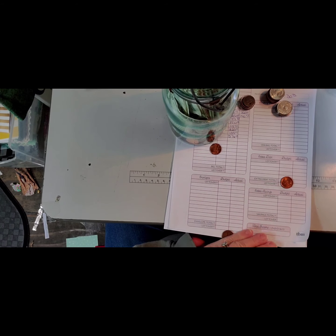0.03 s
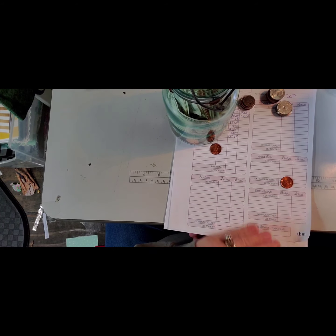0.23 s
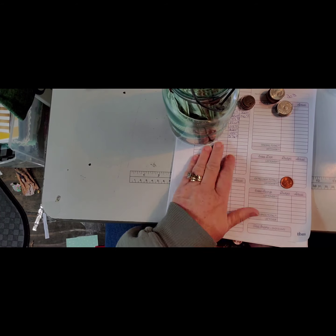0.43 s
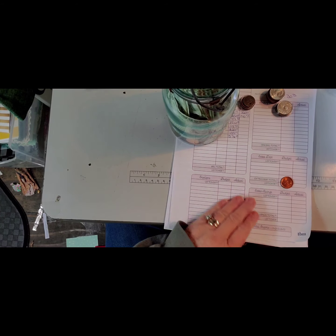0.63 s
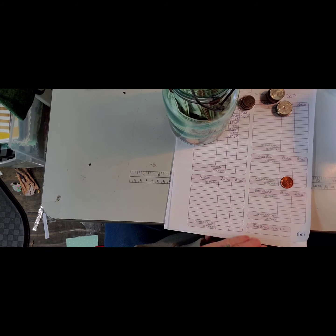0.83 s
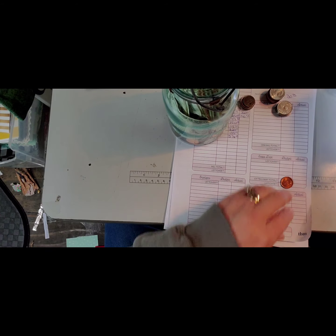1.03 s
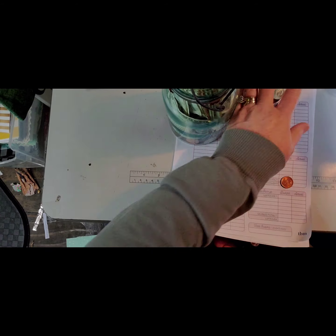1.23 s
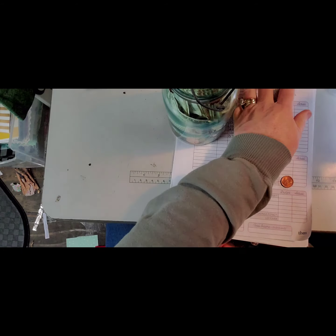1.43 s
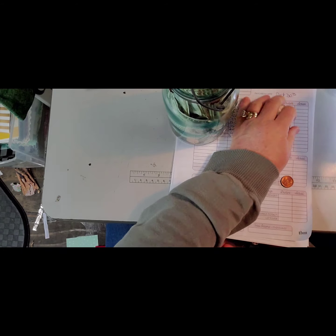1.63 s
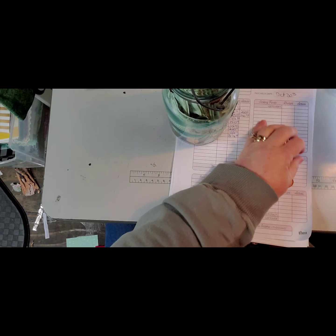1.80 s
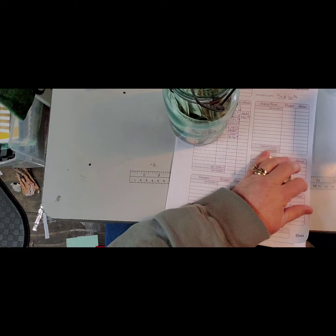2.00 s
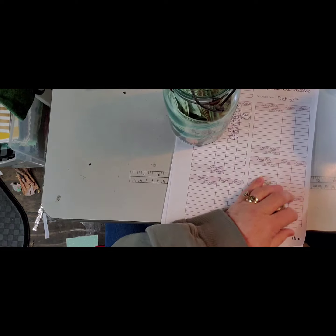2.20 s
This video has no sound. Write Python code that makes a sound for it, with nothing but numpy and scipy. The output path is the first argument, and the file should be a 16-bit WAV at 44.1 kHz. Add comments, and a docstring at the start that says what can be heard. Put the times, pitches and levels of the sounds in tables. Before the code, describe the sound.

Coins jingle quickly as a hand sweeps them up, a palm softly brushes paper, a coin clacks and the table is knocked, a glass jar clinks, then more coins tap and scrape over paper; close stereo, quiet small room.

```python
"""At a paper-covered table in a quiet room, coins are swept into a palm and jingle there.
A palm brushes the paper, knocks sound on the table and a glass jar is clinked after a faint touch.
Then more coins are tapped and dragged over the sheet, clicking together.
Coins and jar are impacts that excite decaying modes; knocks and taps are heavily damped impacts.
Sliding and brushing are stick-slip noise through resonances, above a low hum and room rumble."""
import sys
import numpy as np
from scipy import signal
from scipy.fft import rfft, irfft
from scipy.io import wavfile

SR = 44100
rng = np.random.default_rng(int(sys.argv[2]) if len(sys.argv) > 2 else 0)


def transcribe(u):
    """Save the signal u as a 16-bit wav file named by the first command-line argument.

    u: samples, shape (n,) or (channels, n), limited to [-1, 1]; the rate is SR.
    q: integer samples, one column per channel.
    """
    v = np.clip(np.atleast_2d(u).T, -1, 1)
    q = np.round(v * 32767).astype(np.int16)
    wavfile.write(sys.argv[1], SR, q)


N = 99577
TIME = np.arange(N) / SR  # s

# spectrum of a blunt contact with the table: (frequency [Hz], relative level [dB])
KNOCK_BODY = [(100, 1), (280, -1), (480, -5), (750, 8.5), (1050, 11), (1600, 9.5), (2150, -3), (2900, 4.5),
              (4000, 1), (4800, 5.5), (6000, 2), (6900, 5), (7800, -3), (10000, -17), (14500, -8)]
# spectrum of coins touching the paper: (frequency [Hz], relative level [dB])
TAP_BODY = [(200, -53.5), (950, -30), (1400, 1.5), (2100, -9), (2700, -3), (3400, -6), (5000, -4),
            (6400, 4), (8100, 1), (9500, -24), (12500, -12.5), (14500, -17)]


def amp(db):
    """Amplitude ratio: 20 dB is a factor of ten."""
    return 10 ** (np.asarray(db) / 20)


def evened(x):
    """Power normalisation: scales to rms 1 over all channels."""
    return x / np.sqrt(np.mean(x ** 2) + 1e-20)


def unit(x):
    """Energy normalisation: scales each channel to energy 1."""
    return x / np.sqrt(np.sum(x ** 2, -1, keepdims=True) + 1e-20)


def read(points, hz):
    """Logarithmic pitch scale: interpolates a table along log frequency."""
    f, value = np.transpose(points)
    return np.interp(np.log(hz + 1), np.log(f + 1), value)


def level(curve):
    """Amplitude envelope: gain from a dB curve, silent beyond 30 ms outside it."""
    s, db = np.transpose(curve)[:2]
    inside = (TIME > s[0] - .03) * (TIME < s[-1] + .03)
    return amp(np.interp(TIME, s, db)) * inside


def sides(pan_db):
    """Level-difference stereo: left and right gains that differ by pan_db."""
    return amp([[pan_db / 2], [-pan_db / 2]])


def add(mix, s, sound):
    """Superposition: mixes a sound in at time s, in place."""
    part = mix[:, max(round(s * SR), 0):][:, :sound.shape[1]]
    part += sound[:, :part.shape[1]]


def convolve(x, response):
    """Linear filtering: convolves channel by channel, keeping the length."""
    return signal.fftconvolve(x, np.atleast_2d(response), axes=1)[:, :x.shape[1]]


def colour(x, body, tilt_db=0):
    """Minimum-phase filter of unit energy with the given spectrum, tilted per octave above 500 Hz."""
    hz = abs(np.fft.fftfreq(2048, 1 / SR))
    tilt = tilt_db * np.log2(np.maximum(hz, 500))
    log_gain = np.log(amp(read(body, hz) + tilt))
    # the Hilbert transform of the log gain gives the phase of a causal response
    response = np.fft.ifft(np.exp(signal.hilbert(log_gain).conj())).real
    return convolve(x, unit(response[:len(hz) // 2]))


def pair(x, body=((1, 0), (2, 0))):
    """Spatial coherence: two unrelated signals become alike in the bass, as at two near microphones."""
    # (frequency [Hz], left-right correlation [0 to 1])
    likeness = [(30, .96), (120, .9), (300, .78), (800, .85), (1500, .75), (3500, .5), (7000, .15),
                (14000, 0)]
    hz = np.fft.rfftfreq(x.shape[1], 1 / SR)
    a, b = rfft(x)
    same = np.clip(read(likeness, hz), -1, 1)
    mid = a * np.sqrt(1 + same)
    side = b * np.sqrt(1 - same)
    return irfft(np.array([mid + side, mid - side]) * amp(read(body, hz)), x.shape[1])


def resonate(x, hz, width):
    """Moving resonance: shifts the curve hz down to zero, low-passes there and shifts back."""
    turn = np.exp(2j * np.pi * np.cumsum(hz * np.ones(N)) / SR)
    r = np.exp(-np.pi * width / SR)
    slow = signal.lfilter([1], [1, -2 * r, r * r], x / turn)
    return evened((turn * slow).real)


def friction(per_s, spread_db, smooth):
    """Stick-slip friction: noise bursts from tiny slips of uneven size over a smooth hiss."""
    slip = rng.random(N) < per_s / SR
    size = amp(spread_db * np.minimum(rng.exponential(1, N), 3.5)) * slip
    burst = signal.lfilter([1], [1, -np.exp(-1 / (0.00019 * SR))], size)  # 0.19 ms decay
    return evened(pair((evened(burst) + smooth) * rng.standard_normal((2, N))))


def crackle(per_s, spread_db, count=20):
    """Shot noise: separate tiny contacts, each a short grain at one of count pitches."""
    grain_s = .0002  # time constant
    t, out = TIME[:256], np.zeros((2, N))
    for hz in np.linspace(1400, 14500, count):
        touch = rng.random(N) < per_s / count / SR
        size = amp(spread_db * np.minimum(rng.exponential(1, N), 3)) * touch
        grain = np.exp(-t / grain_s) * ring(hz, 0, 0.33)[:, :len(t)]
        out += signal.oaconvolve(size[None], grain, axes=1)[:, :N]
    return evened(out)


def contact(scatter_s, scatter_db, lag_size=4):
    """Impulse excitation: a click that reaches the left microphone first, with decaying chatter."""
    t = TIME[:SR // 4]
    chatter = pair(rng.standard_normal((2, len(t)))) * amp(-60 * t / scatter_s)
    x = amp(scatter_db) * unit(chatter)
    x[0, 0] += 1
    x[1, lag_size] += 1  # lag in samples
    return x


def ring(hz, db, t60):
    """Damped oscillation: one dying mode, with its own phase at each microphone."""
    t = TIME[:SR // 4]
    rise = 1 - np.exp(-t * hz)
    phase = rng.random((2, 1)) * min(hz / 12000, 1)  # cycles
    return rise * amp(db - 60 * t / max(t60, .002)) * np.sin(2 * np.pi * (hz * t + phase))


def coin_ring(struck_hz=0):
    """Modal synthesis: the modes of mixed coins sum, and those near struck_hz stand out."""
    # modes of the coins: (frequency [Hz]) and their (strength [dB])
    mode_hz = [3531, 5075, 5433, 5615, 5776, 6643, 6829, 7287, 7521, 7849, 8258, 9593, 12576, 12648, 12790,
               12930, 13050, 13150, 13537, 14147, 14400]
    mode_strength = [-14, -4, -5, -5, -6, -7, -7, -8, -2, -5, -3, -12, 1, 3, 0, -2, 1, -2, -1, -4, -9]
    struck_db, struck_width_hz = 7, 400
    detune, spread_db, t60_s = .002, 2.5, .085  # detune is a fraction of the frequency
    hz = np.array(mode_hz)
    struck = struck_db * np.exp(-((hz - struck_hz) / struck_width_hz) ** 2)
    db = mode_strength + struck + spread_db * rng.standard_normal(len(hz))
    return unit(sum(ring(f * (1 + detune * rng.normal()), mode_db, t60_s) for f, mode_db in zip(hz, db)))


def coins():
    """Impact and free vibration: coins click, ring as the hand lets them, and jostle in between."""
    # coin on coin: (time [s], level [dB], brightness [dB/octave, held to -5 or more],
    # ringing relative to the click [dB], pitch that rings most [Hz])
    clinks = [(.0115, -17.5, -7, -1, 4970), (.0183, -15.5, 27, 3.5, 12500), (0.0786, -6, 0.5, -13, 9600),
              (.0843, -28, 16, -6, 12500), (0.1003, -20, 0, 4, 6650), (.1045, -29, 10, 3.5, 12300),
              (0.1373, -20.5, -4, 4, 12580), (.174, -32, 14, 3, 7900), (0.1955, -12, 16, -6, 14000),
              (0.2032, -21, 2, 0.5, 7600), (.2195, -28, -12, 8, 6800), (0.2306, -24, -3, 11, 13200),
              (0.237, -37, 11, 9, 13400), (0.2566, -13.5, 4.5, -3, 7540), (0.2617, -10, 2, -7, 7300),
              (.2680, -19, 1.5, 11, 12640), (0.2743, -14, 4, -7, 12600), (0.32, -28.5, -2.5, -6, 12500),
              (0.9558, -38, 0, 16, 6700), (0.9613, -8.5, -0.5, -3, 5570), (0.982, -29.5, -4, 5, 5500),
              (0.9953, -15.5, 2, -8, 5360), (1.046, -12, -5.5, -21, 13200), (1.083, -31, -2.5, -6, 5660),
              (1.7487, -27.5, 0.5, -8, 6700), (1.8243, -14, 6, -3.5, 5620), (1.9773, -23.5, 13, -6, 13600),
              (2.0041, -27, 4, -8, 12600), (2.1473, -17.5, 15.5, -8.5, 12500)]
    # coins damped by the hand: (frequency [Hz], relative level [dB])
    coin_body = [(300, -54.5), (2300, -16.5), (3200, -1), (4400, 0.5), (5300, 1.5), (6200, 1), (7300, 2.5),
                 (8400, 1), (9500, -8), (11300, -5.5), (12900, 7.5), (14500, -13)]
    # small jostling between the clinks: (time [s], level [dB])
    jostle = [(0, -45.5), (.022, -47.5), (.05, -66), (.07, -55), (.11, -43), (.13, -83), (.15, -61),
              (.185, -48), (.205, -39), (.25, -45.5), (.28, -47.5), (.302, -52.5), (.33, -57), (.37, -77)]
    # where the coins are: (time [s], left over right [dB])
    coin_place = [(.3, 0.3), (.96, 2), (2.1, 2.5)]
    scatter_s, chatter_db = .011, 35.5  # chatter is raised or lowered with the ringing
    out = np.zeros((2, N))
    for s, db, tilt_db, ring_db, struck_hz in clinks:
        click = unit(colour(contact(scatter_s, chatter_db + ring_db), coin_body, max(tilt_db, -5)))
        add(out, s, amp(db) * (click + amp(ring_db) * coin_ring(struck_hz)))
    slips = crackle(per_s=1100, spread_db=5.5) * level(jostle)
    out = out + amp(-1) * colour(slips, coin_body) + amp(-8.5) * convolve(slips, coin_ring())
    pan_db = np.interp(TIME, *np.transpose(coin_place))
    return out * amp([pan_db / 2, -pan_db / 2])


def sliding():
    """Stick-slip and sympathetic resonance: coins scrape the paper and the sheet sounds under them."""
    # coins sliding toward the table edge: (time [s], level [dB]), (frequency [Hz], relative level [dB])
    edge_slide = [(0, -46), (.06, -50), (.16, -46), (.24, -47.5), (.29, -55), (.34, -75)]
    edge_body = [(300, -53), (1250, -19), (1500, -11), (1780, 1), (2050, -40), (2700, -12), (3200, 4.5),
                 (4100, -3), (6000, -19.5), (14500, -6.5)]
    # coins dragged over the paper: (time [s], level [dB]), (frequency [Hz], relative level [dB])
    drag = [(1.53, -115), (1.545, -53), (1.58, -68.5), (1.63, -58.5), (1.675, -65), (1.72, -62.5),
            (1.79, -62.5), (1.835, -58), (1.88, -57.5), (1.95, -64), (1.99, -59.5), (2.08, -65.5),
            (2.26, -65)]
    drag_body = [(410, -25), (700, -17.5), (1060, -17.5), (1250, -4), (1500, -12.5), (1640, -4), (2310, -7),
                 (2720, -8), (4460, -9), (6040, -7), (7890, -11.5), (9540, -12), (14500, -12.5)]
    # share of crackle in the drag, falling as the coins settle flat: (time [s], level [dB])
    drag_crackle = [(1.53, 0), (1.7, 0), (1.9, -9), (2.26, -14)]
    # sheet and table under the dragged coins: (time [s], level [dB], resonance [Hz])
    drag_drone = [(1.55, -89.5, 1530), (1.63, -55.5, 1400), (1.69, -65, 1230), (1.74, -73, 1350),
                  (1.80, -68.5, 1400), (1.834, -48.5, 1380), (1.89, -59, 1400), (1.96, -75, 1550),
                  (1.98, -53, 1900), (2.03, -82, 1840), (2.1, -77, 1340)]
    edge = colour(friction(per_s=2300, spread_db=4.0, smooth=0.89), edge_body) * level(edge_slide)
    catches = colour(crackle(per_s=500, spread_db=2), TAP_BODY) * level(drag_crackle)
    hiss = 1.43 * colour(friction(per_s=1300, spread_db=-10, smooth=8.7), [(200, -27)] + drag_body)
    s, _, hz = np.transpose(drag_drone)
    slips = friction(per_s=980, spread_db=4, smooth=1.0)
    drone = resonate(slips, np.interp(TIME, s, hz), width=350) * level(drag_drone)
    return edge + sides(pan_db=1.5) * ((catches + hiss) * level(drag) + drone)


def blows(table, body, scatter_s, scatter_db):
    """Overdamped impact: dead blows, coloured by what they land on."""
    out = np.zeros((2, N))
    for s, db, tilt_db in table:
        blow = unit(colour(contact(scatter_s, scatter_db), body, tilt_db))
        add(out, s, amp(db) * sides(pan_db=2) * blow)
    return out


def taps():
    """Impact on a soft layer: coins tip and tap on the paper."""
    # (time [s], level [dB], brightness [dB/octave])
    tap_hits = [(1.5435, -28, -3), (1.5483, -18.5, 4.5), (1.5528, -22.5, 1.5), (1.5636, -29, 0),
                (1.5892, -31, -2), (1.5982, -27, 5), (1.6113, -26, -2.5), (1.634, -25.5, -1.5),
                (1.6511, -24.5, 2), (1.665, -21.5, 5), (1.6705, -36, -1), (1.685, -46, 2),
                (1.697, -23.5, 3.5), (1.8242, -22.5, -3), (1.838, -31, -7.5), (1.9768, -28.5, -7)]
    return blows(tap_hits, TAP_BODY, scatter_s=0.016, scatter_db=2.5)


def clacks():
    """Impact of flat faces: coins land flat with single clacks and almost no chatter."""
    # (time [s], level [dB], brightness [dB/octave]), (frequency [Hz], relative level [dB])
    clack_hits = [(.9619, -12, 0), (1.8245, -25, 5)]
    clack_body = [(150, -18), (500, -6), (1200, 0), (3000, 5), (4600, 5), (5600, 9.5), (7500, 7.5),
                  (9000, 3), (10000, -6), (14500, -4)]
    return blows(clack_hits, clack_body, scatter_s=0.002, scatter_db=-8)


def knocks():
    """Impact on a damped plate: blunt knocks on the table."""
    # (time [s], level [dB], brightness [dB/octave])
    knock_hits = [(.494, -39, 0), (1.0452, -6, 1.5), (1.0504, -27.5, 1), (1.173, -36, 0), (2.103, -32, 2)]
    return blows(knock_hits, KNOCK_BODY, scatter_s=0.01, scatter_db=-4)


def hiss_swells():
    """Swelling noise: a short faint hiss rises up to a knock and to the jar clink, then stops."""
    # (time the hiss stops [s], level [dB], build-up time constant [s], brightness [dB/octave])
    swell_ends = [(1.0457, -32, 0.0072, 4.5), (1.293, -49, 0.0019, 3)]
    hiss = friction(per_s=3100, spread_db=-6, smooth=0.66)
    out = np.zeros((2, N))
    for s, db, build_s, tilt_db in swell_ends:
        swell = np.exp(-abs(TIME - s) / build_s) * (TIME < s)
        out += colour(hiss * amp(db) * swell, KNOCK_BODY, tilt_db)
    return out


def jar():
    """Modal vibration of a shell: the glass rings shortly, damped by what fills it."""
    # metal against the jar: (time [s], level [dB])
    jar_hits = [(1.275, -32.5), (1.2959, 2.5)]
    # modes of the glass: (frequency [Hz]) and their (strength [dB], t60 [s], left over right [dB])
    glass_hz = [2515, 2590, 3300, 3758, 3989, 4387, 4740, 4790, 4924, 5640, 5770, 5850, 7574, 8520, 10840,
                12180, 13390, 13810]
    glass_modes = [(3, .045, 2), (-3, .025, 2), (-17, .06, 0), (-15, .09, 0), (-17, .06, 0), (-17, .07, 0),
                   (-1, .055, 1), (-5, .04, 1), (-17, .11, 0), (-7, .025, -2), (5, .052, -5),
                   (-15, .13, -4), (-19, .06, 0), (0, .055, -6), (-17, .08, 0), (-17, .09, 0),
                   (-19, .08, 0), (-23, .1, 0)]
    # spectrum of the contact: (frequency [Hz], relative level [dB])
    tick_body = [(200, -30), (900, -24), (1850, -22), (2600, 0), (3200, -5), (3900, -3), (4350, -7),
                 (5300, 0), (6200, -3), (7000, -11), (9000, -11), (14500, -17)]
    lag_s, tick_db = .00004, -7  # the ringing reaches the right microphone later by lag_s
    t = np.maximum(TIME[:SR // 4] - np.array([[0], [lag_s]]), 0)
    glass = 0
    for hz, (db, t60, pan_db) in zip(glass_hz, glass_modes):
        glass = glass + sides(pan_db) * amp(db - 60 * t / t60) * np.sin(2 * np.pi * hz * t)
    glass = glass * (1 - np.exp(-t * glass_hz[0])) ** 2  # soft onset
    tick = unit(colour(contact(scatter_s=.032, scatter_db=9), tick_body))
    out = np.zeros((2, N))
    for s, db in jar_hits:
        add(out, s, amp(db) * (glass / np.linalg.norm(glass) + amp(tick_db) * tick))
    return out


def hand():
    """Friction and cavity resonance: skin and cloth rub, and the hollow under the palm rises in pitch."""
    # palm brushing the paper: (time [s], level [dB], resonance [Hz]), (frequency [Hz], relative level [dB])
    brush = [(0.514, -75.5, 1610), (.545, -60.5, 1840), (.60, -56, 1870), (0.661, -57, 2150),
             (.72, -60, 2320), (.79, -61, 2680), (.85, -68.5, 2560), (.9, -69, 2500), (.95, -75.5, 2670)]
    brush_body = [(470, -40.5), (800, -34), (1160, -13), (1300, -14.5), (1500, -9.5), (1910, -4.5),
                  (2060, -7), (3190, -5), (4310, -11), (7720, -9), (14500, -16.5)]
    # sleeve moving over the table: (time [s], level [dB]), (frequency [Hz], relative level [dB])
    sleeve = [(1.08, -103), (1.15, -77), (1.21, -86), (1.27, -64), (1.35, -61), (1.395, -65.5),
              (1.45, -74.5), (1.52, -103)]
    sleeve_body = [(500, -12.5), (1800, -5), (3000, 10), (3800, 4), (6000, -0.5), (10000, -12.5),
                   (14500, -28.5)]
    # low rustle of the arm: (time [s], level [dB]), (frequency [Hz], relative level [dB])
    arm = [(.8, -75), (1.2, -76), (1.6, -74.5), (1.95, -70.5), (2.15, -67), (2.26, -65)]
    arm_body = [(60, -10), (150, -8), (270, 2), (500, -13), (1200, -37), (4000, -55)]
    hollow_db = -10  # relative to the rub
    s, _, hz = np.transpose(brush)
    rub = friction(per_s=2100, spread_db=-8, smooth=5.7)
    hollow = resonate(pair(rng.standard_normal((2, N))), np.interp(TIME, s, hz), width=700)
    palm = (colour(rub, [(300, -33)] + brush_body) + amp(hollow_db) * hollow) * level(brush)
    cloth = friction(per_s=600, spread_db=-4.5, smooth=1.3)
    return palm + colour(cloth, sleeve_body) * level(sleeve) + colour(cloth, arm_body) * level(arm)


def background():
    """Stationary noise and a narrow-band tone: room rumble, faint hiss and a wavering low hum."""
    # spectrum of the room noise: (frequency [Hz], relative level [dB])
    floor_body = [(20, -28), (30, -10), (42, -1), (65, -0.5), (95, -7.5), (145, -17), (280, -16),
                  (400, -20.5), (800, -30.5), (1800, -29.5), (3000, -33.5), (8000, -36), (9500, -48),
                  (13000, -38.5), (14500, -44)]
    floor_db, hum_db = -64.5, -64  # rms
    hum_hz, hum_width_hz, waver = 81.56, 40.6, 0.64
    hum = np.sin(2 * np.pi * hum_hz * TIME)
    hum = hum + waver * resonate(rng.standard_normal(N), hum_hz, hum_width_hz)
    noise = evened(pair(rng.standard_normal((2, N)), floor_body))
    return amp(floor_db) * noise + amp(hum_db) * evened(hum)


def room(x, wet_db):
    """Reverberation: quick reflections from table and jar, then the faint tail of a small room."""
    # decay of the tail: (frequency [Hz], t60 [s])
    room_t60 = [(200, 0.25), (1500, 0.14), (5000, 0.11), (14000, 0.046)]
    early_t60_s, early_db, tail_db = 0.058, -5, -17.5  # levels before wet_db
    t = TIME[:SR // 2]
    sparse = rng.standard_normal((2, len(t))) * (rng.random((2, len(t))) < .15)
    early = unit(pair(sparse) * amp(-60 * t / early_t60_s) * (t > .003))
    # each frequency band of the tail decays at its own rate
    hz, s, z = signal.stft(pair(rng.standard_normal((2, len(t)))), SR, nperseg=256)
    decay = amp(-60 * s / read(room_t60, hz)[:, None])
    tail = signal.istft(z * decay, SR)[1][:, :len(t)] * (t > .008)
    return x + amp(wet_db) * convolve(x, amp(early_db) * early + amp(tail_db) * unit(tail))


def scene():
    """Superposition of all sources at the table; reverberation is added to some of them."""
    hits = room(coins(), wet_db=-1.5) + room(taps(), wet_db=5.0)
    hits = hits + room(knocks() + hiss_swells(), wet_db=-4.5) + room(jar(), wet_db=-8)
    return hits + clacks() + sliding() + hand() + background()


def record(dry):
    """Band limitation: a linear-phase low-pass at 14750 Hz."""
    low_pass = signal.firwin(255, 14750, window=("kaiser", 8), fs=SR)
    return signal.oaconvolve(dry, low_pass[None], "same")


dry = scene()
out = record(dry)
transcribe(out)
```